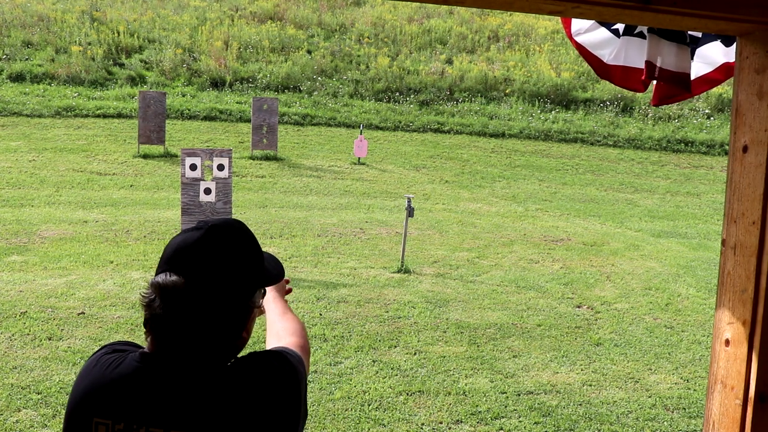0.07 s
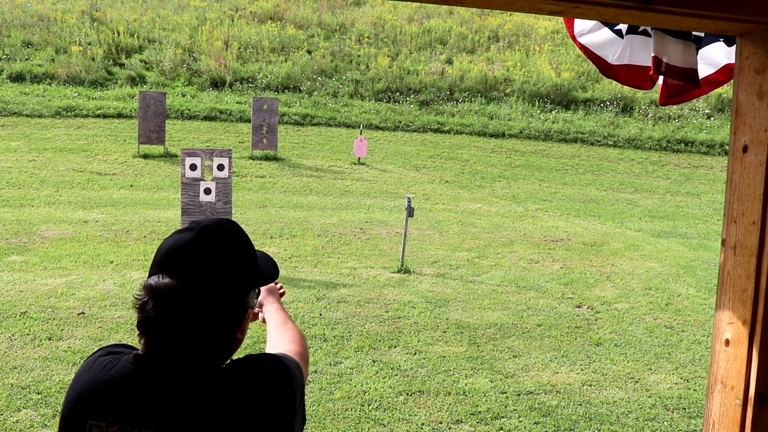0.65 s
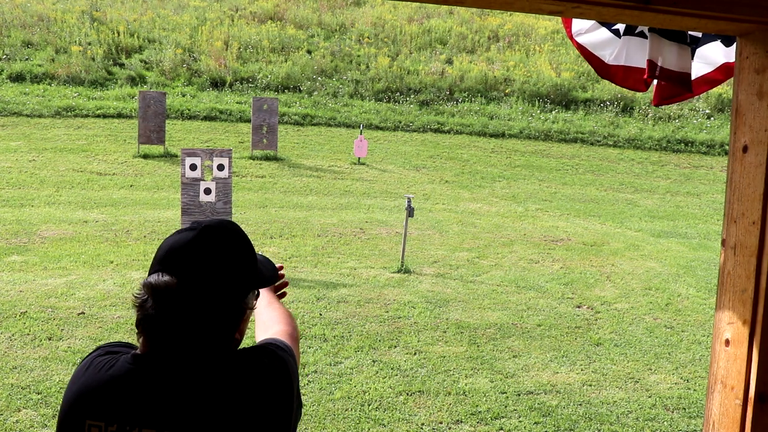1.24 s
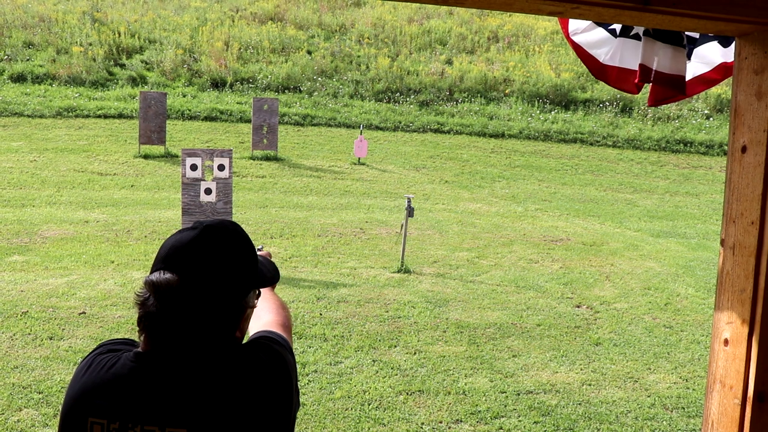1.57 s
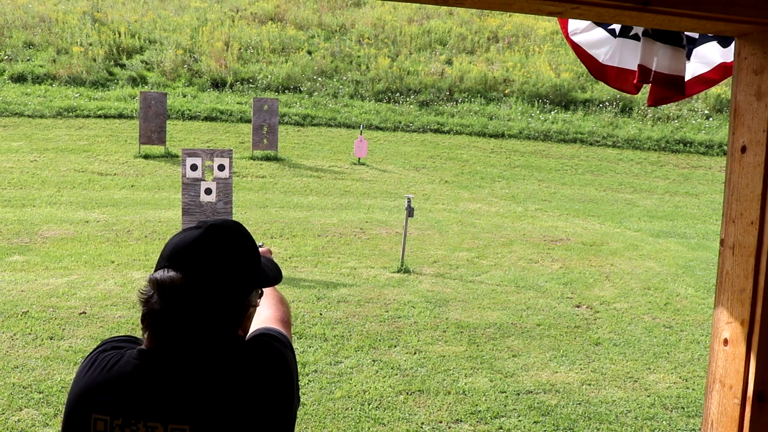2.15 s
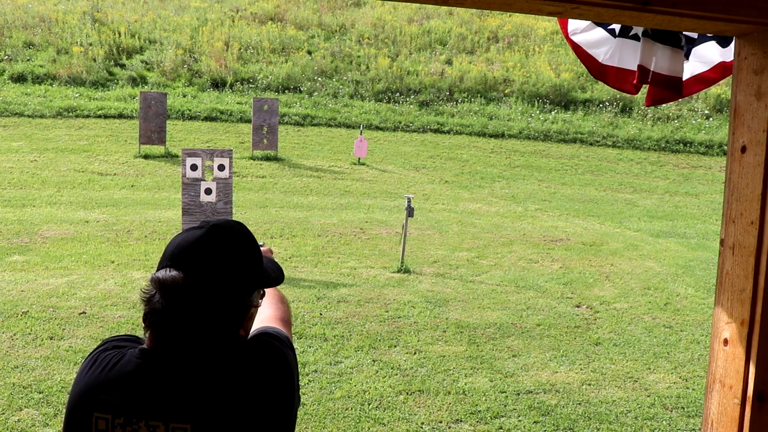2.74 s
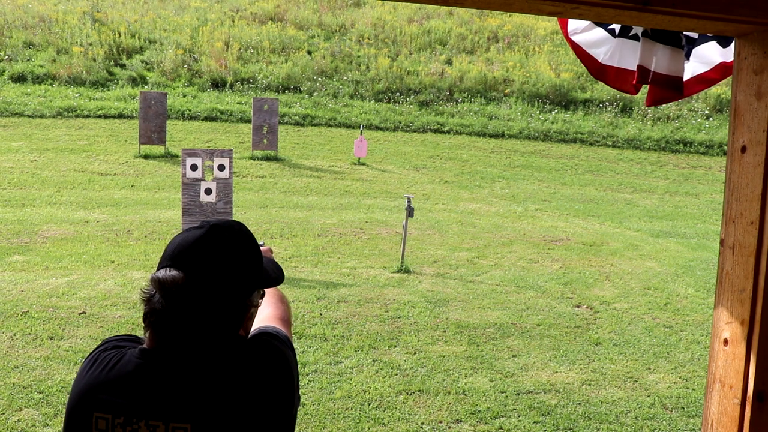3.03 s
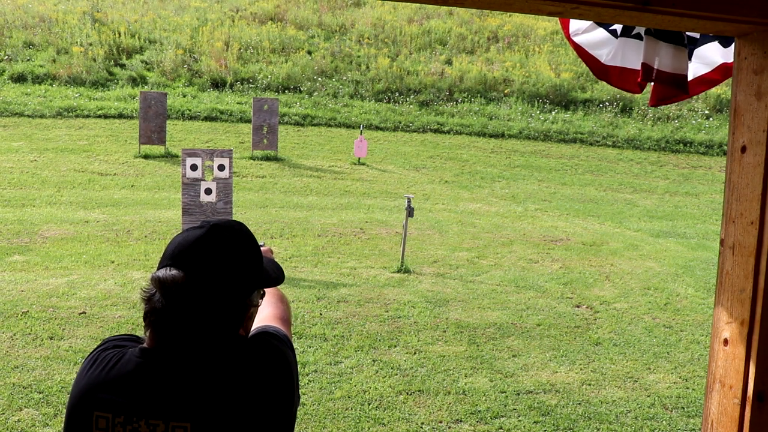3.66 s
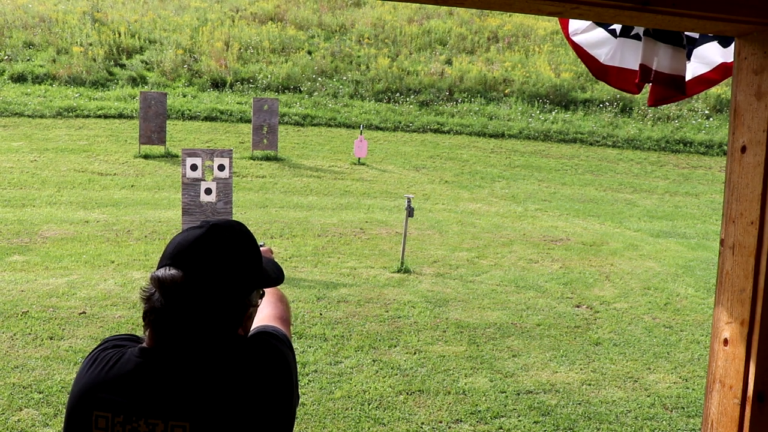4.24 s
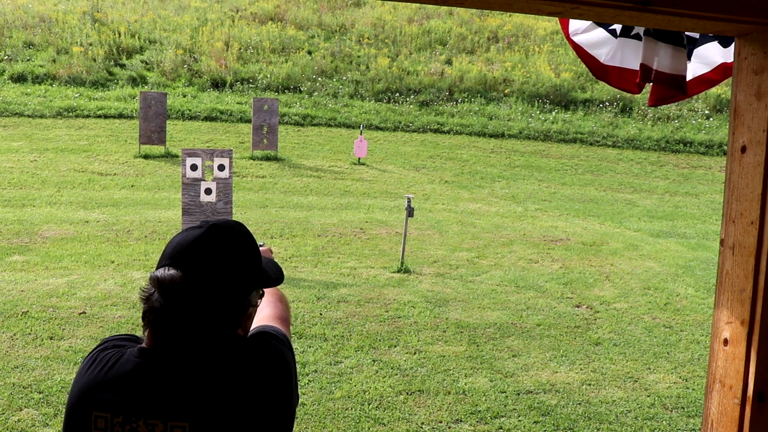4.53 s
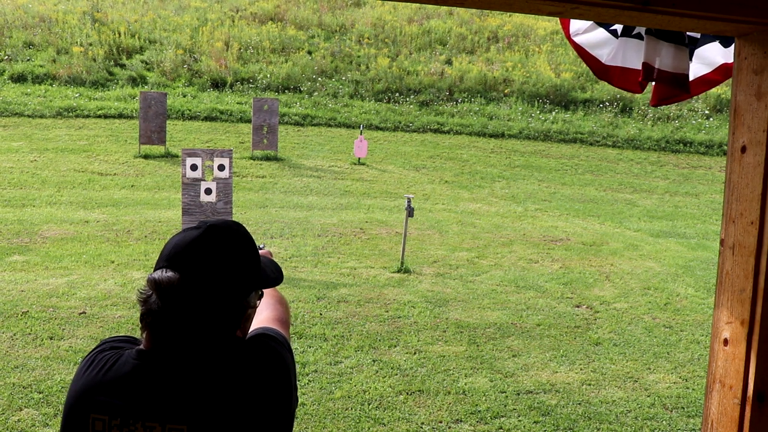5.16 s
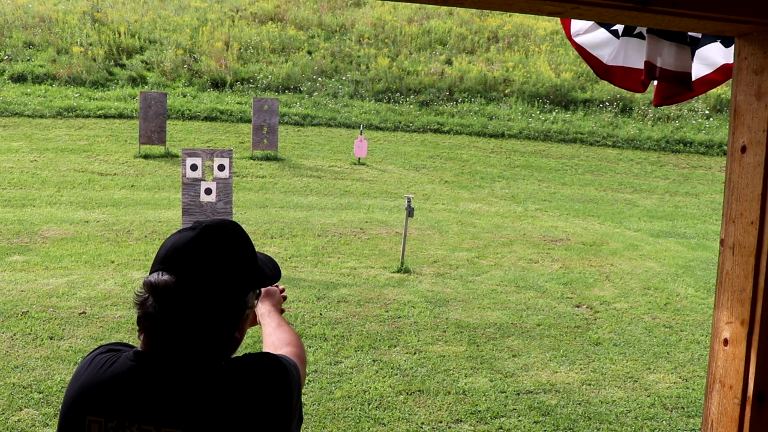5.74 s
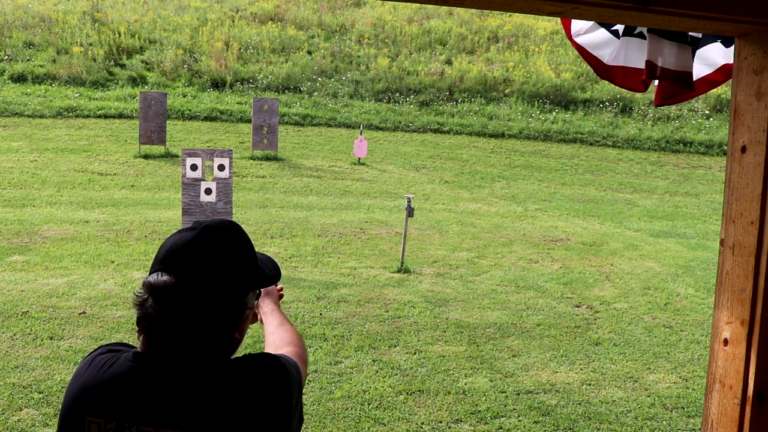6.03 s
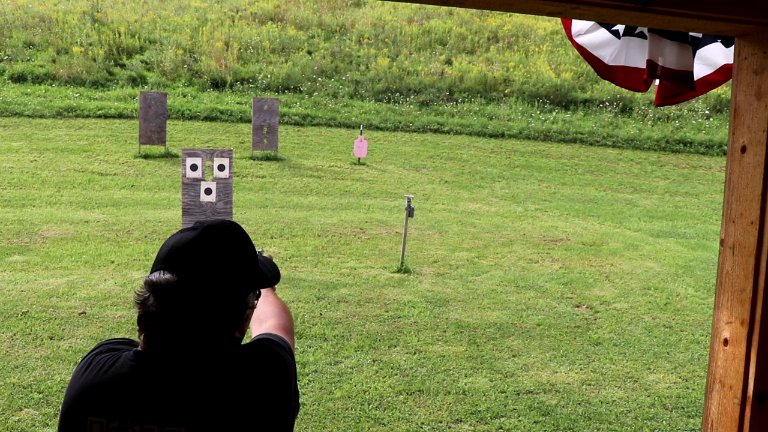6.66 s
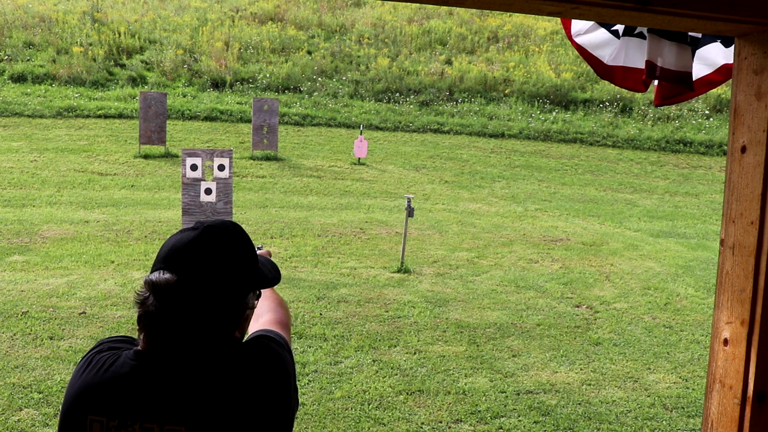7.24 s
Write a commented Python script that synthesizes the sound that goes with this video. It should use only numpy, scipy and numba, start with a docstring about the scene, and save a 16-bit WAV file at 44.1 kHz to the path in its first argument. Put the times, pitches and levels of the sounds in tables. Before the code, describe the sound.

A small revolver is cocked, fires one sharp shot that rings a steel target and echoes, then is cocked again over chirring insects.

```python
"""Insects chirr at a grassy range while the echo of an earlier shot dies away. Under a wooden shelter a
small revolver is cocked, each catch exciting the modes of its steel parts, then fired and cocked again.
The shock wave reverberates in the shelter, the bullet sets a steel plate ringing, and the report rolls
back from field and trees. Faint birds and a far engine lie behind it all.
The blast overloads the microphone's preamp, and gain control ducks everything after it."""
import sys
import numpy as np
from scipy import signal
from scipy.fft import rfft, irfft
from scipy.io import wavfile
from scipy.ndimage import uniform_filter1d, minimum_filter1d
from numba import njit

SR = 44100
rng = np.random.default_rng(int(sys.argv[2]) if len(sys.argv) > 2 else 0)


def write(x):
    x = np.atleast_2d(x).T
    wavfile.write(sys.argv[1], SR, np.round(np.clip(x, -1, 1) * 32767).astype(np.int16))


N = 330750
TIME = np.arange(N) / SR
SHOT_S, EARLIER_SHOT_S = 4.9511, -.592
# spectrum of the report, shared by the gas jet and the echoes: frequency_hz, density_db
REPORT_SPECTRUM = [(60, -37), (170, -33), (300, -14.5), (480, 1), (850, 2), (1200, -0.5), (1900, -6.5),
                   (3200, -12), (5000, -19), (7500, -29), (10500, -33.5), (16000, -49)]


def amp(db):
    """Converts decibels to an amplitude ratio."""
    return 10 ** (np.asarray(db) / 20)


def unit(x):
    """Scales to rms 1."""
    return x / np.sqrt(np.mean(x ** 2) + 1e-20)


def read(points, hz):
    """Interpolates a table on a log-frequency axis."""
    table_hz, value = np.transpose(points)
    return np.interp(np.log(hz + 1), np.log(table_hz + 1), value)


def add(mix, start_s, sound):
    """Superposition: adds a sound, which may start before time zero."""
    at = round(start_s * SR)
    sound = sound[max(-at, 0):]
    part = mix[max(at, 0):][:len(sound)]
    part += sound[:len(part)]


def cut(x, hz, kind):
    """A two-pole filter, 12 dB an octave."""
    return signal.sosfilt(signal.butter(2, hz, kind, fs=SR, output="sos"), x)


def noise(spectrum, size):
    """Spectral shaping: white noise takes on the given spectrum, at rms 1."""
    gain = amp(read(spectrum, np.fft.rfftfreq(size, 1 / SR)))
    return unit(irfft(rfft(rng.standard_normal(size)) * gain, size))


def drift(hz):
    """A random fluctuation of rms 1, band-limited to about hz."""
    gain = np.exp(-(np.fft.rfftfreq(N, 1 / SR) / hz) ** 2)
    return unit(irfft(rfft(rng.standard_normal(N)) * gain, N))


def narrowband(hz, spread_hz):
    """Random modulation in quadrature spreads a tone into a narrow band around hz."""
    phase = 2 * np.pi * np.cumsum(hz * np.ones(N)) / SR
    return unit(drift(spread_hz) * np.cos(phase) + drift(spread_hz) * np.sin(phase))


def ring(modes, t):
    """Free vibration after a blow: a sum of exponentially damped modes."""
    return sum(amp(db - 60 * t / t60) * np.sin(2 * np.pi * hz * t) for hz, db, t60 in modes)


def outdoor_air(level_db=-43, swell_db=.3, swell_hz=4.5):
    """Ambient noise: a low broadband wash whose level wavers slightly."""
    # outdoor background: frequency_hz, density_db
    spectrum = [(10, -2.5), (30, 11.5), (45, 12.5), (62, 11), (78, 4.5), (130, 3), (160, -5), (200, -3),
                (270, -10.5), (430, -5.5), (750, -5.5), (1100, -11), (1800, -14), (2700, -23),
                (4200, -26.5), (10000, -29.5), (15500, -29.5)]
    return amp(level_db + swell_db * drift(swell_hz)) * noise(spectrum, N)


def far_engine(hum_hz=107, waver_hz=1.1):
    """A periodic source heard as one low tone, modulated slowly in pitch and level."""
    # course of the hum: time_s, level_db
    levels = [(0, -48.5), (1.5, -46.5), (2, -55.5), (3.6, -64), (4.3, -52), (6.2, -56), (6.7, -49),
              (7.5, -51.5)]
    phase = 2 * np.pi * np.cumsum(hum_hz + waver_hz * drift(3.76)) / SR
    level_db = np.interp(TIME, *np.transpose(levels)) + 1.5 * drift(9.2)
    return np.sqrt(2) * amp(level_db) * np.sin(phase)


def birds(blur_hz=170):
    """Faint frequency glides, blurred by distance into narrow bands."""
    # far calls: start_s, length_s, first_hz, last_hz, level_db
    calls = [(1.531, .15, 3900, 3350, -64), (3.42, 0.3, 3800, 3480, -69), (4.284, 0.11, 2080, 2220, -61),
             (4.57, .07, 2550, 2500, -69)]
    out = np.zeros(N)
    for start_s, length_s, first_hz, last_hz, db in calls:
        progress = np.clip((TIME - start_s) / length_s, 0, 1)
        pitch_hz = first_hz + (last_hz - first_hz) * progress
        out += amp(db) * np.sin(np.pi * progress) * narrowband(pitch_hz, blur_hz)
    return out


def insects(chorus_db=-46, shimmer_db=1, hush_db=-2.5, resume_s=3.1):
    """Stridulation: many singers blend into noise; wing strokes modulate the amplitude of the nearest."""
    # chorus in the long grass: frequency_hz, density_db
    spectrum = [(4000, -47), (4800, -18), (5450, -7), (5750, -9.5), (6400, -2), (6700, -2), (7400, 2),
                (7800, 2.5), (8050, -5.5), (8500, -11.5), (8950, -13.5), (9300, -50)]
    # nearest singers: pitch_hz, width_hz, level_db, stroke_rate_hz
    singers = [(7340, 180, -56, 25), (8200, 80, -64, 27), (8650, 120, -68.5, 38)]
    # the chorus thins after each shot and gradually comes back
    startled = sum((TIME > s) * np.exp(-abs(TIME - s) / resume_s) for s in (EARLIER_SHOT_S, SHOT_S))
    out = noise(spectrum, N) * amp(chorus_db + hush_db * startled + shimmer_db * drift(130))
    for hz, width_hz, db, stroke_rate_hz in singers:
        wings = 1 + .5 * np.sin(2 * np.pi * stroke_rate_hz * TIME + drift(7.4))
        out += amp(db) * wings * narrowband(hz, width_hz / 2)
    return out


def rolling_echo(grain_db=-0.4, flutter_db=1.32, absorption_db_per_khz_s=2.74):
    """Scattering: each stretch of land returns a swell of noise, dulled with time by air absorption."""
    # lawn, long grass, edge and depth of the near trees, two far tree lines:
    # delay_s, level_db, swell_s, t60_s, treble_slope_db_per_octave
    echoes = [(.04, -3, .02, 0.65, -4), (.16, -16, .04, 1.65, 1.5), (0.411, -18, 0.058, 0.56, 2.5),
              (.55, -23.5, 0.079, 1.43, -0.22), (1.06, -38, 0.15, 3.1, 2.5),
              (1.14, -29.5, 0.051, 1.62, -3.5)]
    size = 5 * SR // 2
    returns = rng.standard_normal(size)
    returns *= amp(grain_db * drift(500)[:size] + flutter_db * drift(26)[:size])
    hz, t, spectra = signal.stft(unit(returns), SR, nperseg=512)
    treble_octaves = np.log2(np.maximum(hz / 450, 1))[:, None]
    power = 0
    for delay_s, db, swell_s, t60_s, slope in echoes:
        swell = np.exp(np.minimum(t - delay_s, 0) / swell_s)
        decay = amp(-60 * np.maximum(t - delay_s, 0) / t60_s)
        power += (swell * decay * amp(db + slope * treble_octaves)) ** 2
    absorption = amp(-absorption_db_per_khz_s * hz[:, None] / 1000 * t)
    colour = unit(amp(read(REPORT_SPECTRUM, hz)))[:, None] * absorption
    return signal.istft(spectra * colour * np.sqrt(power), SR, nperseg=512)[1][:size]


def steel_plate():
    """The bullet's impact excites the plate's inharmonic, lightly damped modes."""
    # plate modes: pitch_hz, level_db, t60_s
    modes = [(509, -12, 0.8), (730, -26, 0.69), (1600, -27, 1), (1600, -29, 0.93), (2450, -26, 0.66),
             (2519, -33, 0.46), (3553, -31, 0.54)]
    return ring(modes, TIME[:2 * SR])


def downrange(round_trip_s=0.14, earlier_db=1.5):
    """Travel time: each shot echoes, and the plate is heard after the bullet goes out and sound returns."""
    out = np.zeros(N)
    for shot_s, db in [(EARLIER_SHOT_S, earlier_db), (SHOT_S, 0)]:
        add(out, shot_s, amp(db) * rolling_echo())
        add(out, shot_s + round_trip_s, amp(db) * steel_plate())
    return out


def shelter(x, wet_db, roof_db=-19, roof_s=0.0039, roof_spread_s=0.00058):
    """Reverberation: a smeared reflection off the rafters and a diffuse tail from the boards join x."""
    # colour of the reflections: frequency_hz, density_db
    spectrum = [(40, -32), (130, -12), (200, -3), (300, 14.5), (400, 1), (900, 4.5), (1250, -0.5),
                (2100, -5), (3300, 1), (4500, 0), (6500, -6.5), (11000, 2), (15000, -1)]
    # reverberation time, short in the bass, which the open sides let out: frequency_hz, t60_s
    decay_times = [(100, 0.054), (250, 0.099), (500, 0.3), (4000, 0.35), (14000, 0.31)]
    hz, frame_s, spectra = signal.stft(x, SR, nperseg=256)
    decay = amp(-60 * frame_s[frame_s < .5] / read(decay_times, hz)[:, None]) ** 2
    decay /= decay.sum(1, keepdims=True)
    fed_power = uniform_filter1d(abs(spectra) ** 2, size=5, axis=0)
    stored_power = signal.fftconvolve(fed_power, decay, axes=1)[:, :len(frame_s)]
    scatter = signal.stft(noise(spectrum, N), SR, nperseg=256)[2]
    scatter *= np.sqrt(abs(stored_power) / np.mean(abs(scatter) ** 2))
    tail = signal.istft(scatter, SR, nperseg=256)[1]
    t = TIME[:SR // 50]
    roof = noise(spectrum, len(t)) * np.exp(-t / roof_spread_s)
    out = x.copy()
    add(out, roof_s, amp(wet_db) * tail)
    add(out, roof_s, amp(roof_db) * signal.fftconvolve(x, roof / np.linalg.norm(roof)))
    return out


def lockwork(scrape_db=-7.5, scrape_s=0.0016, seat_s=.0004, spring_s=0.00089, spring_t60_s=0.0042):
    """Impact excitation: each catch scrapes and rings pawl and grip; frame and spring follow at once."""
    # catches of hammer and cylinder: start_s, force_db, frame_db, pawl_db, spring_db, spring_hz, grip_db
    catches = [(0.5799, -10, 10.5, 11, 9, 15400, -15), (0.6482, -12, 5.5, -0.5, 5, 14000, -1),
               (0.6840, 0.5, 8.5, 1, -16, 15000, -1.5), (0.8761, -21.5, -1, -4, -23, 14000, 12),
               (4.9476, -13, -18, -4, -18, 14000, -2), (5.9426, -12, 11.5, 12.5, -10, 15700, 8.5),
               (5.9998, -4.5, 0.5, -14, -22, 14300, -10), (6.0182, -3.5, 11.5, -3.5, -10, 11400, -0.5),
               (6.1461, -17.5, -14, -30, -9, 11900, 11)]
    # modes of the frame, pawl and grip: pitch_hz, level_db, t60_s
    frame_modes = [(1690, -28.5, 0.0045), (2810, -13, 0.0066), (3520, -9, 0.0031), (4030, -27, 0.031),
                   (4630, -17.5, 0.0071)]
    pawl_modes = [(6410, -4.5, 0.0061), (7030, -3.5, 0.0054), (8240, -9, 0.0045), (8700, -28, 0.0056),
                  (11700, -50, 0.0027)]
    grip_modes = [(191, -23.5, 0.019), (1100, -28.5, 0.0036), (1340, -12, 0.011)]
    out, t = np.zeros(N), np.arange(SR // 25) / SR
    for start_s, force_db, frame_db, pawl_db, spring_db, spring_hz, grip_db in catches:
        scrape = amp(scrape_db) * rng.standard_normal(len(t)) * np.exp(-t / scrape_s)
        click = scrape + amp(pawl_db) * ring(pawl_modes, t)
        add(click, seat_s, amp(frame_db) * ring(frame_modes, t))
        add(click, spring_s, ring([(spring_hz, spring_db, spring_t60_s)], t))  # tension sets its pitch
        click = cut(click, hz=1100, kind="highpass")  # small steel parts radiate little bass
        knock = amp(grip_db) * ring(grip_modes, t)
        add(out, start_s, amp(force_db) * (click + knock))
    return out


def blast_wave(t, positive_s):
    """A sudden overpressure falls through zero at positive_s into a shallow rarefaction."""
    return (1 - t / positive_s) * np.exp(-t / positive_s)


def muzzle_blast(shock_db=57.0, shock_s=0.00027, jet_db=44, jet_s=0.0012,
                 push_db=37, push_s=0.00038, push_delay_s=0.0024):
    """Sudden expansion of gas: a shock front and its reflections, a turbulent jet, then a slower push."""
    # direct path, then reflections off the gun, arms and bench: delay_s, level_db
    paths = [(0, 2), (.0006, -8.5), (.0014, -1.5), (.0017, -13.5), (.0021, -17.5), (.0025, -13),
             (.0036, -24)]
    out, t = np.zeros(N), np.arange(SR // 25) / SR
    for delay_s, db in paths:
        add(out, SHOT_S + delay_s, amp(shock_db + db) * blast_wave(t, shock_s))
    add(out, SHOT_S, amp(jet_db) * noise(REPORT_SPECTRUM, len(t)) * np.exp(-t / jet_s))
    add(out, SHOT_S + push_delay_s, amp(push_db) * blast_wave(t, push_s))
    return cut(out, hz=6000, kind="lowpass")  # directivity: the treble goes forward, away from the shelter


def scene():
    """Superposition: all sources reach the two close microphone ports alike."""
    gun = shelter(lockwork(), wet_db=-17.0) + shelter(muzzle_blast(), wet_db=-19.5)
    sound = gun + downrange() + insects() + birds() + far_engine() + outdoor_air()
    return np.array([sound, sound])


@njit
def gain_reduction(over_db, start_db, attack_s, release_s):
    """Envelope follower: the reduction in dB rises quickly to the excess level and relaxes slowly."""
    out, held_db = np.empty(len(over_db)), start_db
    for i in range(len(over_db)):
        lag_s = attack_s if over_db[i] > held_db else release_s
        held_db += (over_db[i] - held_db) / (lag_s * SR)
        out[i] = held_db
    return out


def overload(x, ceiling):
    """Saturation flattens the wave at the ceiling with a firm knee."""
    return x / (1 + (x / ceiling) ** 6) ** (1 / 6)


def record(dry, headroom_db=11, threshold_db=-13, ceiling_db=-5, balance_db=-2.7, band_limit_hz=16200):
    """Nonlinear chain: the preamp saturates, gain control ducks, the output clips and is band-limited."""
    x = overload(dry, amp(headroom_db))
    x = cut(x, hz=82, kind="highpass")  # the preamp is coupled through a capacitor
    peak = -minimum_filter1d(-abs(x).max(0), size=16)
    over_db = np.maximum(20 * np.log10(peak + 1e-9) - threshold_db, 0)
    # the gain starts out still ducked by the earlier shot
    duck_db = gain_reduction(over_db, start_db=5.5, attack_s=0.0033, release_s=0.17)
    x = overload(x * amp(-duck_db), amp(ceiling_db))
    x *= amp([[balance_db / 2], [-balance_db / 2]])  # the right channel is the louder
    low_pass = signal.firwin(127, band_limit_hz, window=("kaiser", 9), fs=SR)
    return signal.oaconvolve(x, low_pass[None], "same")


dry = scene()
out = record(dry)
write(out)
```